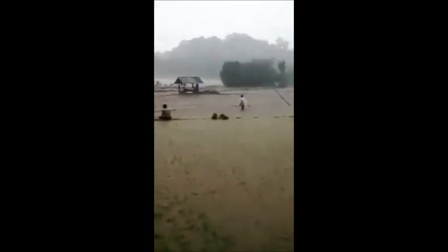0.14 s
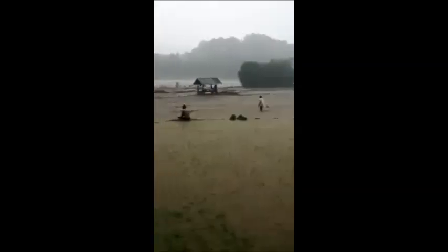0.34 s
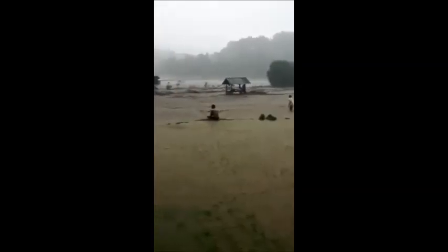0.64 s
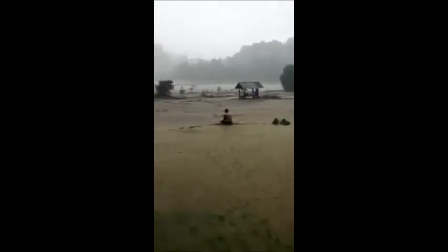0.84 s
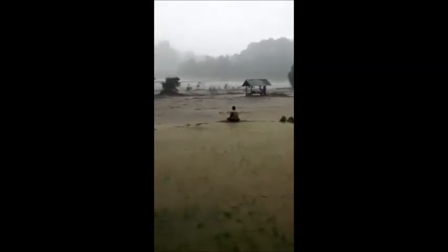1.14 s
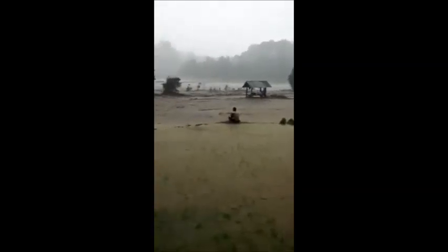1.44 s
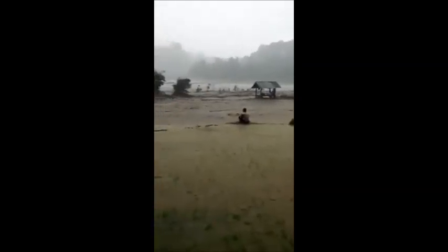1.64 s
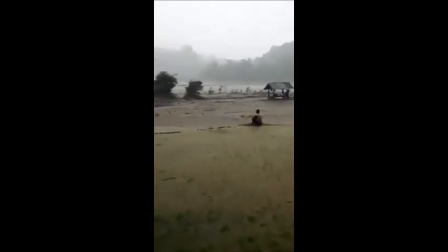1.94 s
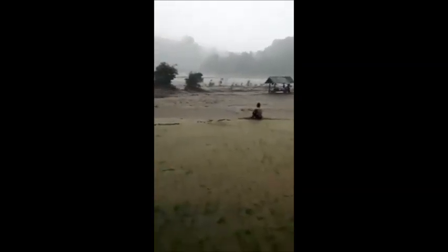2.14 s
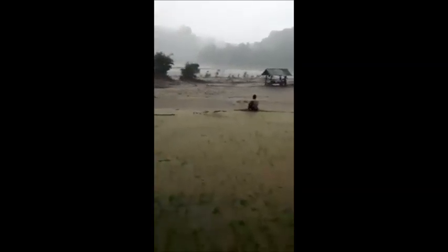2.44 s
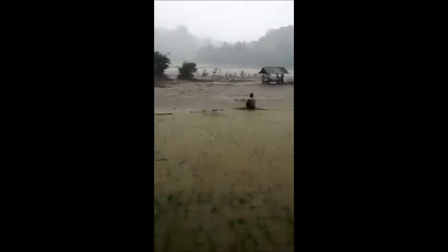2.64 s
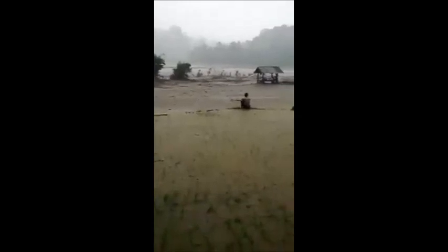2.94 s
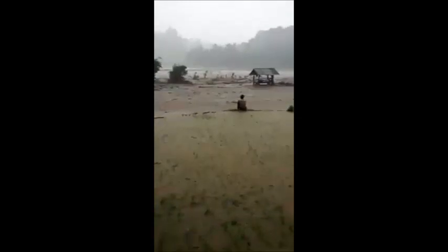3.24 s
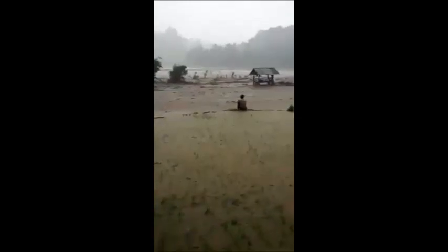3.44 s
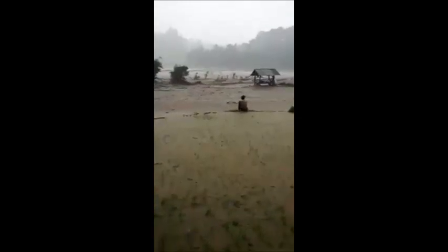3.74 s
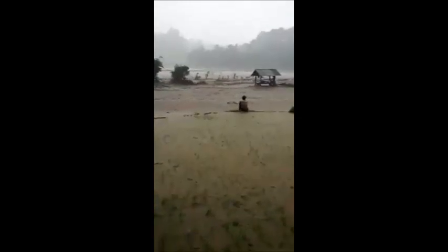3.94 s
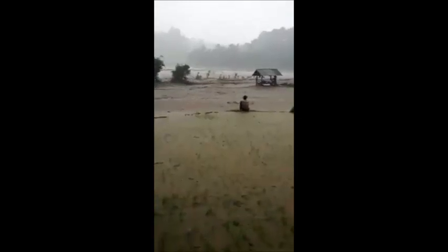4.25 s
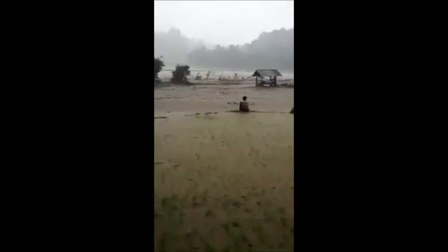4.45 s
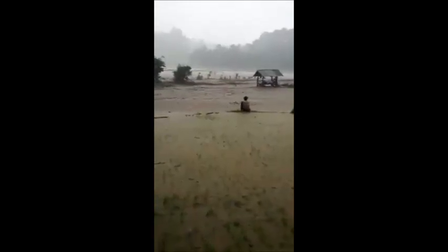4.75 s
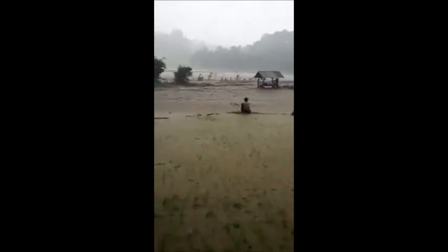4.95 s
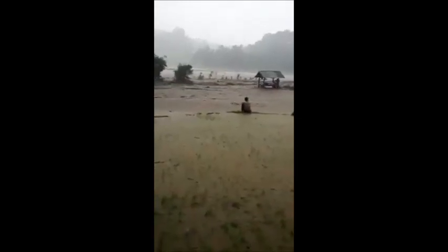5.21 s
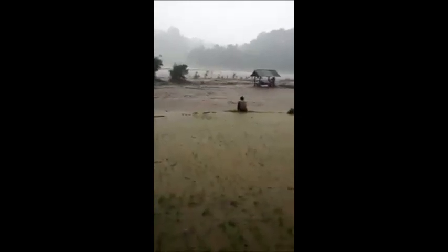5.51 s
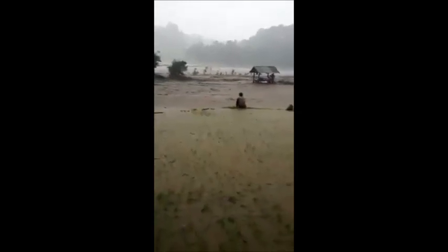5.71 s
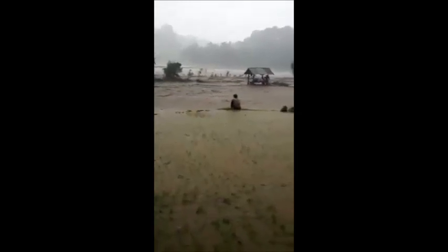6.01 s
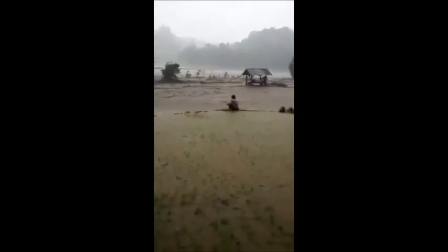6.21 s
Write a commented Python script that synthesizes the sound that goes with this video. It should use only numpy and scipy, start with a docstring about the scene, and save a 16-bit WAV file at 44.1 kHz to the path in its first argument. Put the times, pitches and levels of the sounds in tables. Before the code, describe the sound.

Heavy rain hisses steadily on open water, with flood water rushing in the distance and a few drops ticking close by.

```python
"""A flooded field in heavy rain, heard on one microphone in the open air; the top end is bright and falls away
steeply. Thousands of drops a second land on the open water and merge into a fluttering hiss that slowly grows
louder. Heavier drops slap among them, and a few tick close to the microphone. In the distance the turbulent
flood rushes and its bubbles gurgle faintly. Moving air nudges the microphone."""
import sys
import numpy as np
from scipy import signal
from scipy.fft import rfft, irfft
from scipy.io import wavfile
from scipy.ndimage import uniform_filter1d

SR = 44100
rng = np.random.default_rng(int(sys.argv[2]) if len(sys.argv) > 2 else 0)


def generate_wav(sig):
    """Save sig (samples, or channels by samples) to the path in sys.argv[1] as 16-bit PCM at SR."""
    pcm = np.round(np.clip(np.atleast_2d(sig).T, -1, 1) * 32767).astype(np.int16)
    wavfile.write(sys.argv[1], SR, pcm)


N = 281067

# Table levels are relative, within each table.
# The bright rain hiss as heard, with a raised band from about 4.9 to 6 kHz: frequency_hz, level_db
BRIGHT_HISS_SPECTRUM = [(60, -61), (700, -18), (1800, -11.5), (2500, -16), (3900, -10.5), (4400, -6.5),
                        (4750, -4), (4950, -0.5), (5600, 1.04), (6000, -1.3), (6130, -5), (6720, -5.5)]
# Spectrum of a heavy drop's slap: frequency_hz, level_db
SLAP_SPECTRUM = [(60, -47.0), (400, -14.0), (1200, -3), (4000, 0.0), (6000, 5.5), (8000, 0)]
# Drops landing close to the microphone: start_s, level_db
CLOSE_DROPS = [(0.022, -9.5), (1.408, -14), (1.988, -11), (2.168, -9.5), (4.637, -21)]
# Spectrum of a close drop's tick: frequency_hz, level_db
TICK_SPECTRUM = [(500, -24), (3000, -11.0), (6500, 0), (7300, 11.0), (8500, 8.5)]
# Spectrum of the flood from a distance: frequency_hz, level_db
FLOOD_SPECTRUM = [(25, -53.5), (55, -30), (100, -19), (160, -17), (250, -10.5), (350, -10), (480, -6),
                  (660, -2.5), (1350, -3), (1800, -1.5), (2050, -1.5), (2400, -5.5), (3600, -6.5),
                  (6000, -22)]
# Large bubbles in the flood: start_s, pitch_hz, length_s, level_db
LARGE_BUBBLES = [(.84, 1047, 0.061, -36), (.895, 1105, 0.04, -39), (1.476, 747, 0.048, -37)]
# Spectrum of air rumbling on the microphone: frequency_hz, level_db
RUMBLE_SPECTRUM = [(10, -2.0), (35, -6), (80, -12), (300, -53.5)]
# Soft puffs of air on the microphone: start_s, pitch_hz, length_s, level_db
AIR_PUFFS = [(0.269, 184, 0.068, -49)]
# Steep fall of the top end: frequency_hz, gain_db
TREBLE_ROLLOFF = [(6720, 1.5), (6820, -8), (7450, -9), (7620, -16.5), (7850, -17.5), (7960, -25.5),
                  (8600, -26.5)]


def rain(start_db=-22, growth_db_per_s=0.1065):
    """Splats over the merged hiss of far drops; both surge, and flutter as drops arrive in clumps."""
    splats = impacts(per_s=9000, spread_db=1.64)
    far_hiss = churn(rng.standard_normal(N), depth_db=1.9, bins=9, frames=16)
    bright_hiss = unit_rms(colour(splats + gain_of(-7) * far_hiss, BRIGHT_HISS_SPECTRUM))
    flutter_db = 0.64 * wander(lo_hz=11, hi_hz=17)
    surge_db = 0.44 * wander(lo_hz=3.4, hi_hz=7.3)
    shower_db = start_db + growth_db_per_s * np.arange(N) / SR
    return gain_of(shower_db + surge_db + flutter_db) * bright_hiss


def heavy_drops():
    """Fewer, heavier drops slap the water, each with a broad click."""
    slaps = colour(impacts(per_s=380, spread_db=3.0), SLAP_SPECTRUM)
    return gain_of(-35.5) * unit_rms(slaps)


def close_drops(spray_decay_s=0.015):
    """Drops land by the microphone: a sharp, bright tick, then a short spray of droplets."""
    out = np.zeros(N)
    t = np.arange(SR // 16) / SR
    tick = -4.5 * (t == 0)
    for start_s, level_db in CLOSE_DROPS:
        spray = 0.26 * rng.standard_normal(len(t)) * np.exp(-t / spray_decay_s)
        add(out, start_s, gain_of(level_db) * (tick + spray))
    return colour(out, TICK_SPECTRUM)


def distant_flood():
    """Turbulent water far off: a broad, steady rush that churns in colour and heaves a little."""
    rush = churn(colour(rng.standard_normal(N), FLOOD_SPECTRUM), depth_db=0.92, bins=4, frames=28)
    heave_db = 0.3 * wander(lo_hz=0.4, hi_hz=2.0)
    return gain_of(-34.5 + heave_db) * unit_rms(rush)


def gurgles(small_count=260, lo_hz=620, hi_hz=2600):
    """A few large bubbles among many small ones, half buried in the distant rush."""
    out = np.zeros(N)
    for start_s, pitch_hz, length_s, level_db in LARGE_BUBBLES:
        add(out, start_s, bubble(pitch_hz, length_s, level_db))
    for when, register, life, strength in rng.random((small_count, 4)):
        pitch_hz = lo_hz * (hi_hz / lo_hz) ** register
        length_s = 0.014 + 0.039 * life
        level_db = -48 + 8 * strength + 2.5 * register
        add(out, when * N / SR, bubble(pitch_hz, length_s, level_db))
    return out


def bubble(pitch_hz, length_s, level_db):
    """A bubble rings and rises in pitch as it nears the surface."""
    progress = np.arange(0, length_s, 1 / SR) / length_s
    cycles = np.cumsum(pitch_hz * (1 + 0.055 * progress)) / SR
    return gain_of(level_db) * np.sin(np.pi * progress) * np.sin(2 * np.pi * cycles)


def air_on_microphone():
    """Air moving over the microphone makes a faint, lumpy rumble and a soft puff."""
    rumble = unit_rms(colour(rng.standard_normal(N), RUMBLE_SPECTRUM))
    lumps = gain_of(8 * wander(lo_hz=0.97, hi_hz=5))
    out = gain_of(-78.5) * unit_rms(rumble * lumps)
    for start_s, pitch_hz, length_s, level_db in AIR_PUFFS:
        spectrum = [(pitch_hz / 3, -20), (pitch_hz, 0), (pitch_hz * 3, -25), (pitch_hz * 10, -70)]
        puff = colour(rng.standard_normal(int(length_s * SR)), spectrum)
        add(out, start_s, gain_of(level_db) * unit_rms(puff) * np.hanning(len(puff)))
    return out


def impacts(per_s, spread_db):
    """Impulses at random times: many small ones and a few large."""
    strength = gain_of(spread_db * np.minimum(rng.exponential(1, N), 4))
    polarity = rng.choice([-1, 1], N)
    lands = rng.random(N) < per_s / SR
    return unit_rms(strength * polarity * lands)


def churn(x, depth_db, bins, frames, hop=128):
    """Lets patches of the spectrum, bins wide and frames long, swell and fade on their own."""
    framing = dict(nperseg=4 * hop, noverlap=3 * hop)
    spectra = signal.stft(x, **framing)[2]
    patches = uniform_filter1d(rng.standard_normal(spectra.shape), bins, axis=0)
    patches = unit_rms(uniform_filter1d(patches, frames, axis=1))
    return signal.istft(spectra * gain_of(depth_db * patches), **framing)[1][:N]


def wander(lo_hz, hi_hz):
    """Random drift, mostly between two rates, with an rms of one."""
    hz = np.fft.rfftfreq(N, 1 / SR)
    band = (hz / lo_hz) ** 2 / (1 + (hz / lo_hz) ** 2) / (1 + (hz / hi_hz) ** 2)
    return unit_rms(irfft(rfft(rng.standard_normal(N)) * band, N))


def colour(x, spectrum, size=4096):
    """Causal filter with the given spectrum, so that clicks keep their sharp fronts."""
    frequency_hz, level_db = np.transpose(spectrum)
    bin_hz = abs(np.fft.fftfreq(size, 1 / SR))
    bin_db = np.interp(np.log(bin_hz + 1), np.log(frequency_hz + 1), level_db)
    minimum_phase = np.exp(np.conj(signal.hilbert(np.log(gain_of(bin_db)))))
    taps = np.fft.ifft(minimum_phase).real
    return signal.oaconvolve(x, taps[:size // 2])[:len(x)]


def add(mix, start_s, sound):
    """Mixes a sound in at a time."""
    part = mix[max(round(start_s * SR), 0):][:len(sound)]
    part += sound[:len(part)]


def gain_of(db):
    """Decibels to amplitude."""
    return 10 ** (np.asarray(db) / 20)


def unit_rms(x):
    """Scales to an rms of one."""
    return x / np.sqrt(np.mean(x ** 2) + 1e-20)


def scene():
    """Open air, no echoes: far and near sources simply add at the microphone."""
    water = distant_flood() + gurgles() + rain() + heavy_drops() + close_drops()
    return (water + air_on_microphone())[None]


def record(dry, band_limit_hz=8670):
    """The treble falls away steeply in steps above about 6.7 kHz, then stops at the band limit; one channel."""
    heard = colour(dry[0], TREBLE_ROLLOFF)
    lowpass = signal.firwin(1023, band_limit_hz, window=("kaiser", 9), fs=SR)
    return signal.oaconvolve(heard, lowpass, "same")[None]


dry = scene()
out = record(dry)
generate_wav(out)
```